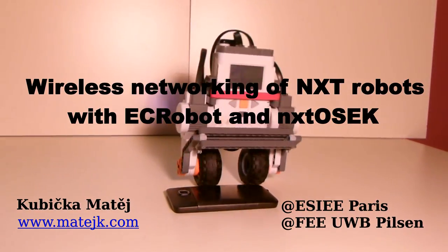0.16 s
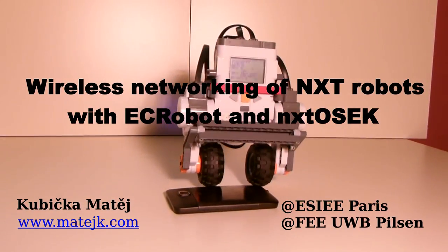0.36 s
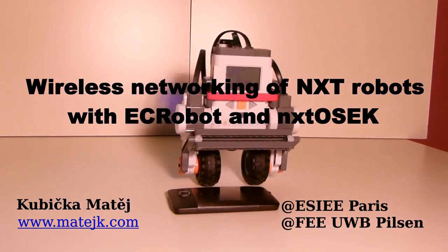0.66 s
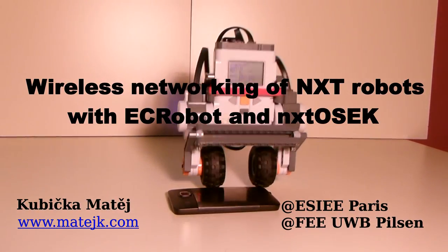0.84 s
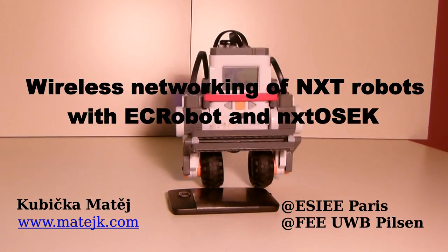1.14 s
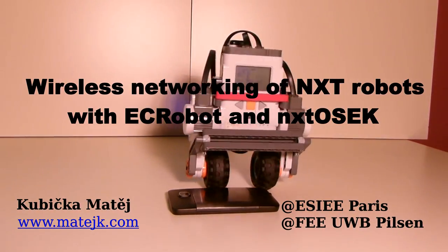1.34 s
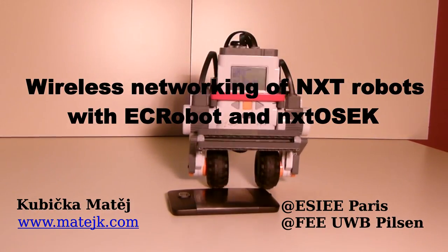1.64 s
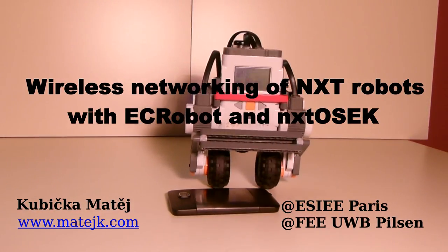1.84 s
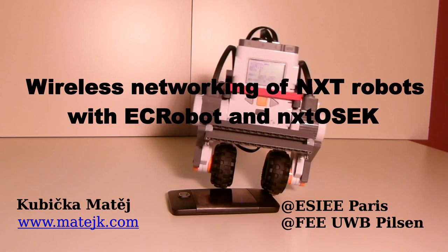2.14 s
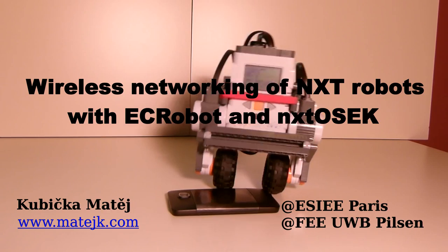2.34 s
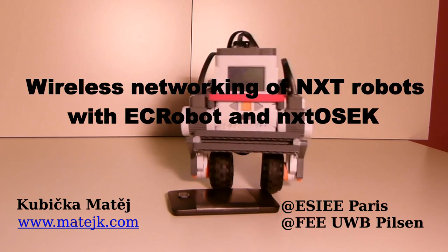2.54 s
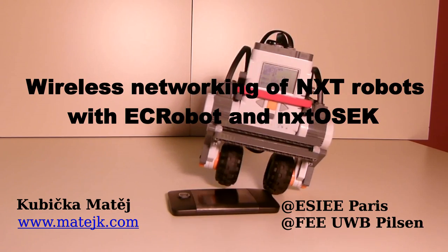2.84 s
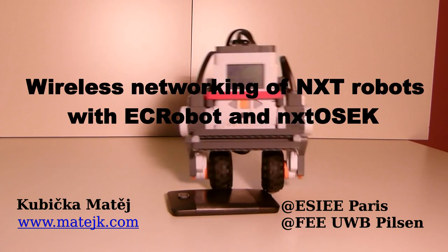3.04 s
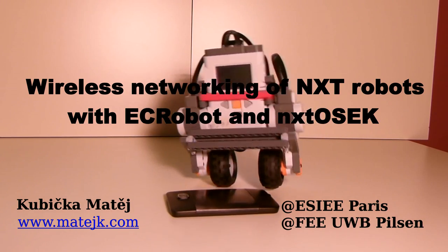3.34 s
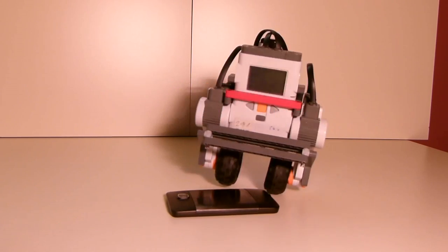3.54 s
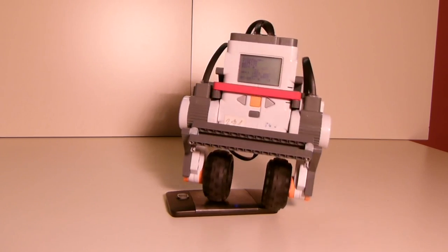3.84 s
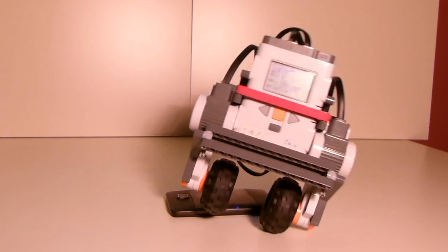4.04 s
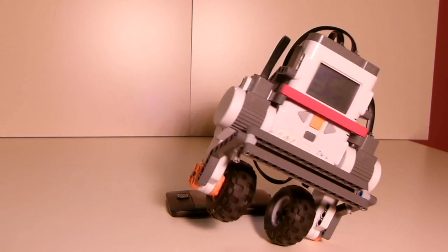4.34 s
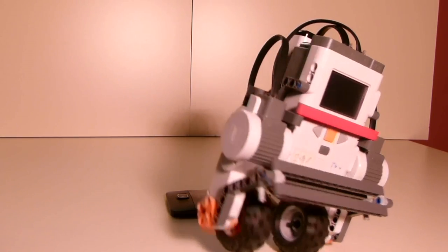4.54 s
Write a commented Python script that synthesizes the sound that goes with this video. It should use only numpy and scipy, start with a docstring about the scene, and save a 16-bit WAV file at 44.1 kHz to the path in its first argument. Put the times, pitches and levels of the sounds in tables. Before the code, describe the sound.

On a table in a small, quiet room, a two-wheeled plastic robot keeps its balance with rapid dry servo whirs separated by tiny gaps. Light clacks, dull wheel thumps and a faint high electronic whine fill in between. Then a stronger, sustained gear whir rises and glides down, nearly stops, and starts again just before the end. Near stereo pickup, slight room echo, faint hum.

```python
"""A small two-wheeled plastic robot balances on a tabletop, its geared motors reversing about three times
a second, then lurches forward. Uneven tooth impacts rattle the resonant housings; at speed the even mesh sings
as a gliding stack of partials. Slack clacks at reversals as short bursts of rattle, the tyres bump ringing table
modes, the motor drive whines on one wavering tone; shaped noise and a thin steady hum make the quiet room."""
import sys
import numpy as np
from scipy import signal
from scipy.fft import rfft, irfft, next_fast_len
from scipy.io import wavfile

SR = 44100
rng = np.random.default_rng(int(sys.argv[2]) if len(sys.argv) > 2 else 0)


def volts_from_decibels(level):
    """Turn decibel levels (scalar or array-like) into linear amplitude factors."""
    exponent = np.asarray(level, float) / 20
    return 10 ** exponent


def pcm_store(signal):
    """Save signal as 16-bit PCM."""
    levels = np.round(np.clip(np.atleast_2d(signal), -1, 1) * 32767)
    wavfile.write(sys.argv[1], SR, levels.astype(np.int16).T)


N = 207005
T = np.arange(N) / SR

# motor runs, one or two surges a reversal:
# (up_to_speed_s, powered_for_s, first_rattle_db, power_off_rattle_db, low_housing_re_rattle_db)
MOTOR_RUNS = [(-.02, 0.032, -29.5, -29, -5.5), (.178, .012, -32, -32, -4.5),
              (.232, 0.095, -28.5, -27.5, -5), (.492, 0.043, -36, -34, -5.5), (.574, 0.038, -32, -28.5, -6),
              (.775, 0.14, -31.5, -26, -6.5), (1.09, .014, -34, -35, -3), (1.15, 0.037, -33.5, -32, -5.5),
              (1.345, 0.13, -34, -28.5, -5.5), (1.65, 0.082, -31, -29.5, -5.5),
              (1.898, 0.18, -30.5, -26, -8), (2.272, 0.047, -38, -39.5, -1), (2.36, 0.057, -38, -38.5, -1),
              (2.58, 0.096, -33, -31.5, -4), (2.854, 0.07, -33.5, -41, -3.5),
              (3.072, 0.098, -28.5, -33.5, -5), (3.3, 0.12, -30, -28, -7)]
SPIN_UP_DB_PER_S, COAST_DB_PER_S, IDLE_DB = 400, 210, -50
# the lurch forward: (time_s, rattle_db, low_housing_re_rattle_db, extra_top_treble_db)
LURCH = [(3.55, -28, -5.5, -7), (3.62, -27.5, -6, 4.5), (3.68, -21, -11.5, 1.5), (3.84, -24, -9, 9),
         (4.02, -29.5, -5.5, 4.5), (4.06, -24.5, -6, 5), (4.3, -38, -5, -9), (4.47, -44.5, -3.5, -6),
         (4.6, -28.5, -4.5, -2), (4.69, -23, -7.5, 2)]
# gear slack taken up: (start_s, rattle_level_db)
SLACK_CLACKS = [(.717, -38), (1.2765, -38), (2.183, -35), (2.4965, -39), (3.0101, -32)]
# housing resonances: (pitch_hz, width_hz, relative_level_db)
HOUSING_MODES = [(4050, 430, -3.5), (5730, 210, 2), (6440, 390, -7.5), (10250, 1300, -3), (12600, 500, -6)]
# broad colour of the gearbox: (frequency_hz, gain_db)
GEARBOX_COLOUR = [(80, -60), (200, -41), (450, -33), (700, -20.5), (1000, -23), (1300, -8.5), (1800, -8.5),
                  (3300, -4.5), (4000, -2), (6300, 1), (8300, -6.5), (12200, -8), (14000, -14.5),
                  (15500, -22)]

# short singing spells of the mesh: (loudest_s, length_s, tooth_rate_hz, glide_hz_per_s, level_db)
SHORT_SONGS = [(0, 0.07, 576, -400, -28.5), (0.299, 0.11, 568, 4.5, -32.5),
               (0.881, 0.138, 538.5, -32.5, -35.5), (1.099, .05, 677, 217, -39.5),
               (1.162, 0.138, 699, 2.5, -43.5), (1.445, 0.076, 538.5, -120, -31),
               (1.912, 0.052, 533.6, 1848.5, -35.5), (2.028, 0.12, 528, 182.5, -35.5),
               (2.854, 0.046, 690, 181, -35), (2.911, 0.055, 727, -0.5, -40.5),
               (3.096, 0.043, 556, -560, -37), (4.074, 0.055, 654.5, -1.5, -38),
               (4.15, 0.13, 516, -300, -39.5)]
# long sweeps of the singing mesh: (step_per_upper_partial_db, rows of (time_s, tooth_rate_hz, level_db))
LONG_SONGS = [(0, [(3.28, 480, -46), (3.31, 580, -36), (3.335, 640, -35), (3.355, 665, -35),
              (3.38, 728, -32), (3.41, 600, -35), (3.445, 440, -43)]), (-9, [(3.58, 600, -42),
              (3.6, 635, -33), (3.62, 690, -36), (3.64, 748, -31), (3.705, 730, -32), (3.725, 735, -44)]),
              (-6.5, [(3.68, 870, -34), (3.715, 860, -37), (3.75, 860, -31), (3.785, 855, -36),
              (3.82, 850, -32), (3.865, 765, -35), (3.905, 680, -34), (3.97, 545, -36)]),
              (-7, [(4.58, 580, -42), (4.62, 630, -34), (4.65, 715, -31), (4.69, 755, -30)])]
# short songs peak in the middle: dB lost, and share of the rate lost, at either end
SONG_SWELL_DB, SONG_SAG = 7, .03
# their step per upper partial, steeper at faster tooth rates
UPPER_DB, UPPER_DB_PER_HZ, UPPER_FROM_HZ = -1, -0.0142, 357

# tyres bumping the tabletop: (start_s, level_db, main_ring_hz)
TYRE_BUMPS = [(0.012, -44.5, 305), (0.044, -50.5, 341), (0.566, -35, 437.5), (0.967, -51.5, 436),
              (1.158, -36.5, 431), (1.682, -37, 440), (2.117, -55, 425.3), (2.635, -50, 330),
              (2.876, -50, 422), (3.086, -48, 302), (3.671, -34.5, 415), (4.3, -53, 412.6),
              (4.652, -44, 296.8), (4.674, -43, 363)]
# table modes: (ratio_to_main_ring, mean_level_db, t60_s)
TABLE_MODES = [(.72, -11, 0.2), (1.0, 9.5, 0.061), (1.55, -3, 0.08), (3.0, 5, 0.05), (4.3, 4, .04),
               (5.6, 2, .03)]
# small knocks in the frame just before a bump: (start_s, peak_db)
FRAME_KNOCKS = [(1.123, -35), (1.653, -34), (3.066, -37)]
KNOCK_HZ, KNOCK_T60_S = 665, .045
# the whole top swaying: (start_s, peak_db)
TOP_SWAYS = [(0.115, -55), (.6, -55.5), (1.17, -68), (4.33, -62), (4.655, -55.5)]
SWAY_HZ, SWAY_S = 147, 0.02

# spells at part power, when the switching tone is heard: (start_s, length_s, level_db)
WHINE_SPELLS = [(0.086, 0.11, -54), (0.423, 0.18, -54), (.7, .07, -54), (1.002, 0.2, -61),
                (2.321, 0.24, -54.5), (2.99, 0.32, -57), (4.24, .3, -65)]
DRIVE_HZ, WHINE_IDLE_DB, WHINE_FADE_S = 7911, -63, 0.0046
# faint pip near the start: (time_s, pitch_hz, level_db)
PIP_GLIDE = [(.05, 640, -58), (.09, 740, -51), (.103, 750, -60), (.118, 760, -46), (.14, 764, -66)]

# likeness of the rattle at left and right: (frequency_hz, likeness_0_to_1)
EAR_LIKENESS = [(300, 1), (1100, 0.9), (3000, .58), (7000, 0.77), (14000, 0.23)]
# balance of the robot: (time_s, left_over_right_db)
BALANCE = [(0, -1.1), (3.8, -1.5), (4.69, -2.5)]
# colour of the room noise before it is levelled: (frequency_hz, density_db_per_hz)
ROOM_COLOUR = [(18, -67), (30, -25), (458, 14.5), (827, 11), (991, 18), (1130, 2), (2200, -45),
               (3400, 13.5), (5690, -30), (10800, -17), (14000, -52)]
ROOM_DB, HUM_HZ, HUM_DB = -54, 995.5, -60
LAG_S = .000012  # right behind left


def unit(x):
    """Scale to rms 1."""
    return x / np.sqrt(np.mean(x ** 2))


def shape(x, gain):
    """Multiply the spectrum by gain(hz)."""
    size = next_fast_len(N + 8192)
    hz = np.maximum(np.fft.rfftfreq(size, 1 / SR), 1)
    return irfft(rfft(x, size) * gain(hz), size)[..., :N]


def along(points, hz):
    """Read (frequency_hz, value) points on a log frequency axis."""
    point_hz, value = np.transpose(points)
    return np.interp(np.log(hz), np.log(point_hz), value)


def walk(rate_hz):
    """Slow random drift of rms 1."""
    return unit(shape(rng.standard_normal(N), lambda hz: 1 / (1 + (hz / rate_hz) ** 2)))


def rattle_levels():
    """Rattle, low housing and top treble in dB: runs spin up, hold under power and coast down; then the lurch."""
    def run(s, db):
        spin_up = SPIN_UP_DB_PER_S * np.maximum(s[0] - T, 0)
        coast = COAST_DB_PER_S * np.maximum(T - s[-1], 0)
        return volts_from_decibels(np.interp(T, s, db) - spin_up - coast)

    lurch_s, lurch_db, lurch_low_db, top_db = np.transpose(LURCH)
    power = run(lurch_s, lurch_db) ** 2 + volts_from_decibels(IDLE_DB) ** 2
    for start, powered, first_db, off_db, _ in MOTOR_RUNS:
        power = power + run([start, start + powered], [first_db, off_db]) ** 2
    low_s = [r[0] + r[1] / 2 for r in MOTOR_RUNS] + list(lurch_s)
    low_db = [r[4] for r in MOTOR_RUNS] + list(lurch_low_db)
    return 10 * np.log10(power), np.interp(T, low_s, low_db), np.interp(T, lurch_s, top_db, left=0)


def teeth(tooth_hz):
    """Uneven tooth impacts, each its own size, over the sliding hiss of the flanks."""
    turn = np.floor(np.cumsum(tooth_hz * (1 + 0.3 * walk(600))) / SR)
    size = volts_from_decibels(0.5 * np.clip(rng.standard_normal(N), -2, 1.6))
    flank = rng.choice([-1, 1], N)  # teeth strike either flank
    hits = (np.diff(turn, prepend=0) > 0) * size * flank
    return unit(hits - hits.mean()) + 2 * rng.standard_normal(N)


def housing(hz):
    """Broad colour of the gearbox with the housing resonances standing on it."""
    modes = sum(volts_from_decibels(db) / (1 + 2j * (hz - f) / width) for f, width, db in HOUSING_MODES)
    return volts_from_decibels(along(GEARBOX_COLOUR, hz)) * (1 + volts_from_decibels(-4) * modes)


def wander(hz, reach_hz, width_hz):
    """Noise in a resonance whose centre roams at random."""
    phase = 2 * np.pi * np.cumsum(hz + reach_hz * np.tanh(walk(6.5))) / SR
    noise = shape(rng.standard_normal(N), lambda f: 1 / (1 + (f / width_hz) ** 2))
    return unit(noise * np.sin(phase))


def slack_clacks():
    """Level bursts as gear slack is taken up, each jumping up and dying away within milliseconds."""
    slack = np.zeros(N)
    for start, level_db in SLACK_CLACKS:
        slack[int(start * SR)] = volts_from_decibels(level_db)
    return signal.lfilter([1], [1, -np.exp(-1 / (0.0038 * SR))], slack)


def gears(db, low_db, top_db):
    """Gear rattle: faster is louder and brighter; each range flickers in level at random."""
    sound = shape(teeth(700 * volts_from_decibels(.3 * (db + 26))), housing)
    low = unit(shape(sound, lambda hz: 1 / (1 + (hz / 2900) ** 8)))
    mid = unit(shape(sound, lambda hz: 1 / (1 + (hz / 8200) ** 8) / (1 + (2900 / hz) ** 8)))
    fizz = unit(shape(sound, lambda hz: 1 / (1 + (8200 / hz) ** 8)))

    low = low + volts_from_decibels(-6.5 + 4 * walk(40)) * wander(1800, 350, 160)
    mid = mid + volts_from_decibels(-8 + 3.7 * walk(10.6)) * wander(3950, 260, 206)
    mid = mid + volts_from_decibels(-12 + 4.64 * walk(55)) * wander(6000, 450, 155)
    low_db = low_db + 0.96 * walk(24)
    fizz_db = -5.5 + 0.03 * (db + 32.5) + 1.86 * walk(35)

    top = shape(fizz, lambda hz: 1 / (1 + (11500 / hz) ** 8))
    top_gain = volts_from_decibels(top_db + 0.5 * np.minimum(db + 29.5, 0))  # weak runs are duller
    fizz = fizz + top * (top_gain - 1)
    bright = mid + fizz * volts_from_decibels(fizz_db)
    bright = bright * np.sqrt(volts_from_decibels(db) ** 2 + slack_clacks() ** 2)  # the slack clacks high
    return (bright + low * volts_from_decibels(low_db + db)) * volts_from_decibels(0.43 * walk(50))


def glide(rows, fade_s=0.0025):
    """Phase and gain of a tone that follows (time_s, pitch_hz, level_db) rows and fades out beyond them."""
    s, hz, db = np.transpose(rows)
    edge = np.clip(np.minimum(T - s[0], s[-1] - T) / fade_s + 1, 0, 1)
    phase = 2 * np.pi * np.cumsum(np.interp(T, s, hz)) / SR
    return phase, np.sqrt(2) * edge * volts_from_decibels(np.interp(T, s, db))


def songs():
    """All singing spells as (step per upper partial in dB, glide rows); short ones swell in the middle."""
    short = []
    for s, length, hz, rate, db in SHORT_SONGS:
        step_db = UPPER_DB + UPPER_DB_PER_HZ * max(hz - UPPER_FROM_HZ, 0)
        rows = []
        for end in (-1, 0, 1):
            offset = end * length / 2
            pitch = hz * (1 - abs(end) * SONG_SAG) + rate * offset
            rows.append((s + offset, pitch, db - abs(end) * SONG_SWELL_DB))
        short.append((step_db, rows))
    return short + LONG_SONGS


def small_housing(hz):
    """The small housing radiates little below 1.3 kHz but for a hollow, and damps the upper partials."""
    hollow = .06 / (1 + ((hz - 730) / 80) ** 2)
    bass = np.maximum(1 / (1 + (1300 / hz) ** 16), hollow)
    favoured = 1 + .9 / (1 + ((hz - 2080) / 130) ** 2)
    return bass * favoured / (1 + (hz / 3000) ** 14)


def mesh_song():
    """At speed the teeth meet evenly: a stack of partials that follows the shaft."""
    out, drift = np.zeros(N), .16 * walk(45)  # drift in radians
    flicker = [volts_from_decibels(2.5 * walk(40)) for _ in range(7)]
    for step_db, rows in songs():
        phase, gain = glide(rows)
        on = gain > 0
        angle = (phase + drift)[on]
        for k in range(1, 7):
            level = flicker[k][on] * volts_from_decibels(step_db * (k - 2))
            out[on] += gain[on] * level * np.sin(k * angle + k * k)
    return shape(out, small_housing)


def ring(hz, t60):
    """One decaying mode, a quarter second long."""
    t = T[:SR // 4]
    return np.sin(2 * np.pi * hz * t) * np.exp(-np.log(1000) * t / t60)


def place(events):
    """Lay (start_s, sound) events on the timeline."""
    out = np.zeros(N + SR)
    for start, sound in events:
        first = int(start * SR)
        out[first:first + len(sound)] += sound
    return out[:N]


def tyre_bumps():
    """Soft rubber blows ring the table, each spot at its own pitch, and shake the loose frame."""
    t, events = T[:SR // 4], []
    push = np.hanning(int(0.00026 * SR))
    frame_band = signal.butter(2, [300, 2200], "band", fs=SR, output="sos")
    no_bass = signal.butter(6, 280, "high", fs=SR, output="sos")
    for start, level_db, hz in TYRE_BUMPS:
        modes = sum(volts_from_decibels(db + 2 * rng.standard_normal()) * ring(hz * ratio, t60)
                    for ratio, db, t60 in TABLE_MODES)
        table = np.convolve(modes, push / push.sum())[:len(t)]
        shake = signal.sosfilt(frame_band, rng.standard_normal(len(t))) * np.exp(-t / 0.035)
        blow = (table + volts_from_decibels(10) * shake) * np.minimum(t / .0025, 1)  # soft onset
        events.append((start, volts_from_decibels(level_db) * signal.sosfilt(no_bass, blow)))
    return place(events)


def frame_knocks():
    """Small knocks in the frame, each one short decaying mode."""
    knock = ring(KNOCK_HZ, KNOCK_T60_S) * np.minimum(T[:SR // 4] / 0.00085, 1)
    return place([(start, volts_from_decibels(db) * knock) for start, db in FRAME_KNOCKS])


def top_sways():
    """The whole tabletop swaying: a low tone that swells and dies."""
    t = T[:SR // 4]
    swell = (t / SWAY_S * np.exp(1 - t / SWAY_S)) ** 2
    sway = swell * np.sin(2 * np.pi * SWAY_HZ * t)
    return place([(start, volts_from_decibels(db) * sway) for start, db in TOP_SWAYS])


def drive_whine():
    """Switching tone of the motor drive, wavering in pitch and level, louder at part power."""
    phase = 2 * np.pi * np.cumsum(DRIVE_HZ + 8 * walk(30)) / SR
    gain = volts_from_decibels(WHINE_IDLE_DB)
    for start, length, db in WHINE_SPELLS:
        gain = gain + volts_from_decibels(db) * np.clip(np.minimum(T - start, start + length - T) / WHINE_FADE_S, 0, 1)
    return np.sqrt(2) * gain * volts_from_decibels(3.9 * walk(23)) * np.sin(phase)


def pip():
    """A faint rising pip near the start: one gliding sine."""
    phase, gain = glide(PIP_GLIDE)
    return gain * np.sin(phase)


def walls(x):
    """Diffuse echo of a small room, alike at both ears in the bass and unrelated above."""
    t, t60 = T[:SR // 2], .22
    tail = rng.standard_normal((2, len(t))) * np.exp(-np.log(1000) * t / t60) * (t > .004)
    tail = volts_from_decibels(-6.5) * tail / np.sqrt(np.sum(tail ** 2, axis=1, keepdims=True))
    mid, side = signal.fftconvolve(x[None], tail, axes=1)[:, :N] / np.sqrt(2)
    side = shape(side, lambda hz: np.clip(hz / 1500, .1, 1))
    return mid + side * np.array([[1], [-1]])


def room_tone():
    """Quiet room noise, alike at both ears in the bass, with a thin steady hum."""
    mid, side = shape(rng.standard_normal((2, N)), lambda hz: volts_from_decibels(along(ROOM_COLOUR, hz)))
    side = shape(side, lambda hz: np.clip(hz / 1800, .12, 1))
    noise = volts_from_decibels(ROOM_DB) * unit(mid + side * np.array([[1], [-1]]))
    hum = np.sin(2 * np.pi * np.cumsum(HUM_HZ + 3 * walk(10.3)) / SR)
    return noise + np.sqrt(2) * volts_from_decibels(HUM_DB + 0.5 * walk(8.5)) * hum


def scene():
    """Two independent rattles, one common to both ears, one opposite in sign, set how alike the ears are."""
    levels = rattle_levels()
    common, opposite = gears(*levels), gears(*levels)

    def alike(hz):
        return np.clip(along(EAR_LIKENESS, hz), .05, 1)

    mid = shape(common, lambda hz: np.sqrt((1 + alike(hz)) / 2))
    mid = mid + drive_whine() + tyre_bumps() + frame_knocks() + top_sways()
    side = shape(opposite, lambda hz: np.sqrt((1 - alike(hz)) / 2))
    song = mesh_song()
    pan_db = np.interp(T, *np.transpose(BALANCE))
    robot = (mid + song + side * np.array([[1], [-1]])) * volts_from_decibels(np.array([pan_db, -pan_db]) / 2)
    # the walls get less of the singing mesh than of the rattle
    return robot + walls(mid + song / 2) + room_tone() + pip()


def top_cut(x):
    """Nothing passes above the cut-off."""
    return signal.sosfilt(signal.butter(12, 15610, fs=SR, output="sos"), x)


def record(dry):
    """Two microphones, the left a hair nearer, round the sharpest peaks and are deaf to deep bass."""
    right = shape(dry[1], lambda hz: np.exp(-2j * np.pi * hz * LAG_S))
    rounded = np.tanh(1.6 * np.array([dry[0], right])) / 1.6
    mix = signal.sosfilt(signal.butter(2, 70, "high", fs=SR, output="sos"), rounded)
    return top_cut(mix)


dry = scene()
out = record(dry)
pcm_store(out)
```